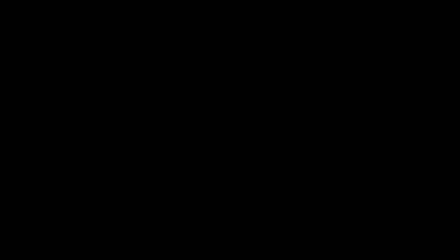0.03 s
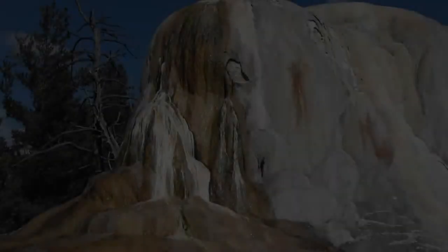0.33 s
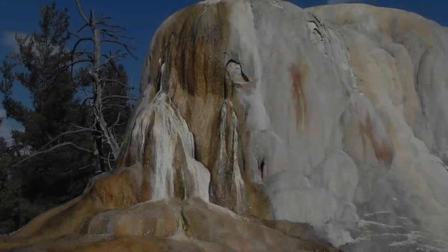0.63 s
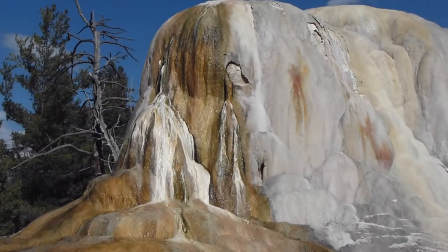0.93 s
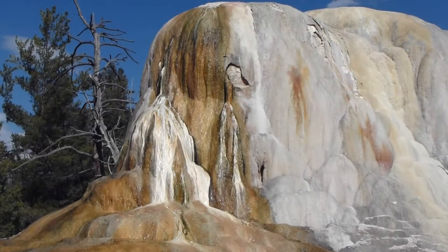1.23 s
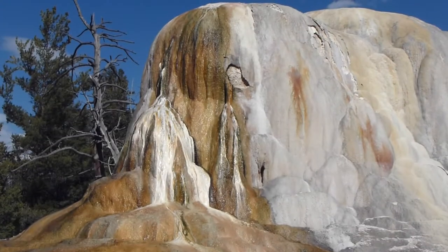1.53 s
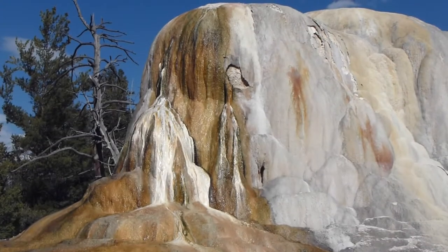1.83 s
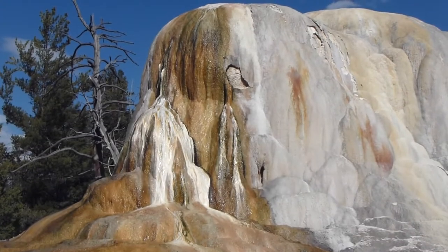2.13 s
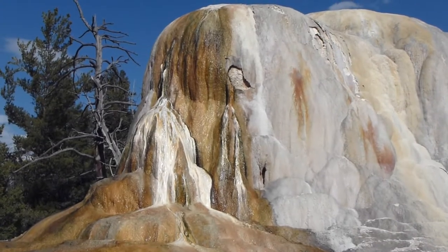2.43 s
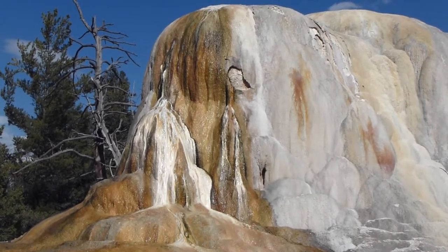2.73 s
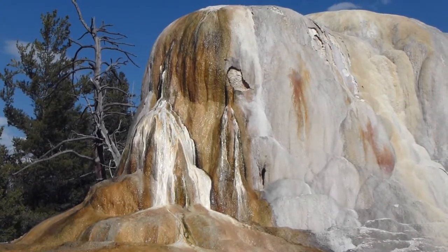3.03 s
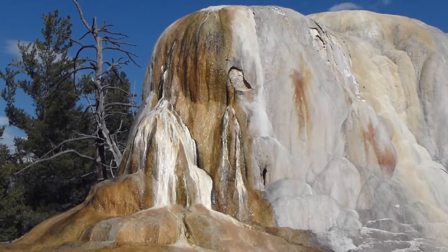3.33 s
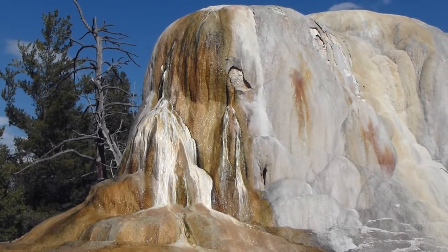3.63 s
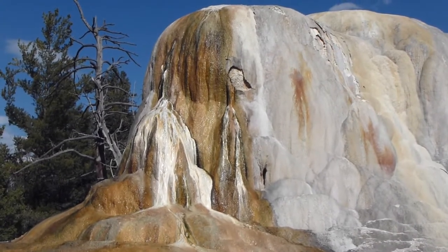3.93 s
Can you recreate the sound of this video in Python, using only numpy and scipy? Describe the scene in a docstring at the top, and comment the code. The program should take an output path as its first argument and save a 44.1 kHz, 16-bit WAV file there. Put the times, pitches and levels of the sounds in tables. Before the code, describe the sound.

Soft wind and faint trickling water outdoors, with a few dull knocks on wood.

```python
"""Beside a hot-spring terrace

Open air fades in: soft wind in the trees and a thin wash of trickling water. The wind is shaped
noise; the water is a crowd of tiny splashes and a fine fizz. A far engine hums underneath, its tones
set by its turning shaft. Small gritty ticks come from close by, and a few dull knocks, like steps on
a boardwalk, stand out as blows set wooden planks ringing."""
import sys
import numpy as np
from scipy import signal
from scipy.fft import rfft, irfft
from scipy.io import wavfile
from scipy.ndimage import uniform_filter1d

SR = 44100
rng = np.random.default_rng(int(sys.argv[2]) if len(sys.argv) > 2 else 0)


def file_out(sig):
    """Save sig as 16-bit WAV at sys.argv[1]."""
    # one column per channel
    cols = np.atleast_2d(sig).T
    # limit, then scale
    lim = np.clip(cols, -1, 1)
    pcm = np.round(lim * 32767).astype(np.int16)
    wavfile.write(sys.argv[1], SR, pcm)


N = 176400  # 4 seconds

# The fade-in. Each row: time in seconds, gain in dB.
FADE_IN = [(.283, -30), (.37, -24), (.47, -18), (.62, -11), (.77, -5.5), (.92, -2.5), (1.07, -0.5),
           (4, -0.5)]
# The airy rush that both sides share. Each row: frequency in Hz, relative level in dB.
AIR_SHARED = [(15, -49), (25, -18), (77, -8), (145, -5.5), (168, -4.5), (196, -2.5), (223, -4), (280, -4),
              (352, -5.5), (454, -7.5), (516, -10.5), (616, -10), (736, -10.5), (1190, -12.5),
              (1500, -17.5), (2250, -18.5), (4710, -29.5), (9610, -36), (10900, -48.5), (14200, -80),
              (22000, -120)]
# The airy rush that differs between the sides. Each row: frequency in Hz, relative level in dB.
AIR_SIDE = [(15, -53), (25, -10), (81, -10), (223, -3), (443, -2), (1080, -4.5), (4960, -14), (7840, -22),
            (9130, -40), (10900, -64), (14200, -72), (22000, -120)]
# Which way the air leans. Each row: frequency in Hz, left minus right in dB.
AIR_LEAN = [(60, -2), (140, 0), (340, -1.0), (790, -1.5), (1870, -3), (4430, 0), (10500, 0.0)]
# The slow swell of the breeze. Each row: time in seconds, gain in dB.
BREEZE_SWELL = [(0, 0), (1.1, 1), (1.5, 2), (2, 1.5), (2.7, 0), (3.25, 1), (3.7, -0.5), (4, 0)]
# The low rush of wind. Each row: time in seconds, level in dB.
GUST_LEVEL = [(.3, -57), (1.1, -50.5), (1.25, -54), (1.36, -58), (1.52, -44), (1.75, -66), (2.7, -68),
              (3.2, -59), (3.5, -48.5), (3.7, -52.5), (4, -46)]
# The fine spray. Each row: time in seconds, level in dB.
SPRAY_LEVEL = [(.3, -66), (.78, -73), (.95, -80), (1.1, -82), (1.7, -69.5), (2.6, -67), (3.2, -67),
               (3.6, -65), (4, -66)]
# The engine's weaker tones. Each row: multiple of the shaft's turning rate, level in dB.
ENGINE_TONES = [(2, -63), (4, -57.5), (8, -61), (10, -59.5), (15, -63)]
# The engine's strongest tone. Each row: time in seconds, level in dB.
MAIN_TONE_LEVEL = [(.3, -46), (.65, -47.5), (1.0, -51), (1.3, -48), (1.58, -54), (1.8, -49), (2.2, -49.5),
                   (2.42, -54), (2.65, -50.5), (2.87, -56), (3.05, -48.5), (3.33, -46.5), (3.56, -53),
                   (3.8, -47.5), (4, -45)]
# Two faint drones. Each row: pitch in Hz, width in Hz, level in dB.
FAINT_DRONES = [(74.4, 7.1, -61.5), (602, 8.3, -62.5)]
# Small ticks nearby. Each row: start in seconds, level in dB, centre frequency in Hz,
# left minus right in dB, seconds to fade by 60 dB.
NEAR_TICKS = [(0.465, -25.5, 1600, 11, 0.0085), (.689, -39, 2000, 4, 0.025), (.815, -41.5, 1930, 10, 0.053),
              (0.852, -50.5, 8700, -30, 0.033), (2.019, -40, 1600, 4, 0.029), (2.039, -47, 2000, 4, 0.035),
              (2.067, -43.5, 1900, 4, 0.054), (2.097, -46, 2000, 2, 0.025), (2.2, -41.5, 1890, 0, .03),
              (2.687, -38, 1500, -1, .025), (3.203, -42, 1900, 0, 0.027), (3.416, -43, 1800, -2, .03)]
# Knocks on wood. Each row: start in seconds, level in dB, treble limit in Hz, thud and scuff in dB
# relative to that level, seconds for the rattle to fade by 30 dB.
WOOD_KNOCKS = [(1.2163, -25, 1300, -8, -30, .06), (1.2505, -28.5, 2300, -1, -18, .05),
               (1.2565, -32, 1300, 1, -25, .03), (1.8335, -27.5, 3000, -13, -12, .055),
               (1.8378, -32, 2800, -4, -11, .045), (1.847, -34, 3000, -2, -11, .03),
               (2.634, -36, 2600, -3, -10, .03), (2.845, -27, 1400, -9, -26, .04),
               (2.986, -36, 2400, -8, -10, .02), (3.091, -32, 1900, -20, -22, .02),
               (3.5196, -31, 1500, -4, -22, .045), (3.5328, -30, 1300, -7, -25, .025),
               (3.9662, -28.5, 1500, -7, -22, .045), (3.982, -37, 2900, -12, -10, .04)]
# The notes a plank rings with. Each row: pitch in Hz, relative level in dB, seconds to fade by 60 dB.
PLANK_NOTES = [(413, -10, .045), (614, -2, .09), (720, 4, .018), (920, -5, .045), (1055, 1.5, .04),
               (1130, 4, .016), (1250, -5, .025), (1830, -5, .015), (2340, -3, .01), (2850, -7, .008)]
# The short rattle after a knock. Each row: frequency in Hz, relative level in dB.
RATTLE_SPECTRUM = [(100, -22), (300, 10), (650, 19), (1200, 6), (1550, -15), (2300, -1.5), (4000, -27),
                   (9000, -12)]


def amp(db):
    """Turns decibels into a gain."""
    return 10 ** (np.asarray(db) / 20)


def unit(x):
    """Scales a signal to an average (rms) level of 1."""
    return x / np.sqrt(np.mean(x ** 2) + 1e-20)


def at_hz(points, hz):
    """Reads a table at the given frequencies, on a log-frequency scale."""
    f, value = np.transpose(points)
    return np.interp(np.log(hz + 1), np.log(f + 1), value)


def over_time(points):
    """Reads a table of times and values at every sample."""
    return np.interp(np.arange(N) / SR, *np.transpose(points))


def add(mix, start_s, sound):
    """Adds a stereo sound into the mix at its start time."""
    part = mix[:, round(start_s * SR):][:, :sound.shape[1]]
    part += sound[:, :part.shape[1]]


def panned(lean_db):
    """Left and right gains; a positive lean favours the left."""
    return amp(np.array([[.5], [-.5]]) * lean_db)


def noise(shape_db, size=N):
    """Noise of level 1, shaped by a function that gives dB for each frequency."""
    gains = amp(shape_db(np.fft.rfftfreq(size, 1 / SR)))
    return unit(irfft(rfft(rng.standard_normal(size)) * gains, size))


def noise_band(centre_hz, octave_db, size=N):
    """Noise that is strongest at its centre and octave_db weaker an octave away."""
    return noise(lambda f: -octave_db * np.log2((f + 1) / centre_hz) ** 2, size)


def drift(rate_hz):
    """A slow random wander of level 1."""
    return noise(lambda f: -20 * np.log10(1 + (f / rate_hz) ** 2))


def patchy(x, patch_db, flicker_db):
    """Lets narrow patches and wide bands of frequencies come and go at random."""
    frames = signal.stft(x, nperseg=512, noverlap=384)[2].T
    narrow, wide = uniform_filter1d(rng.standard_normal((2,) + frames.shape), size=12, axis=1)
    patches = unit(uniform_filter1d(narrow, size=7, axis=1))
    flicker = unit(uniform_filter1d(wide, size=90, axis=1))
    frames = frames * amp(patch_db * patches + flicker_db * flicker)
    return signal.istft(frames.T, nperseg=512, noverlap=384)[1][:N]


def air(shared_db=-43.5, side_db=-48.5):
    """Wind and far water blend into one wide rush that swells with the breeze."""
    rush = patchy(noise(lambda f: at_hz(AIR_SHARED, f)), patch_db=1.2, flicker_db=.4)
    shared = amp(shared_db + over_time(BREEZE_SWELL)) * unit(rush)
    side = amp(side_db) * noise(lambda f: at_hz(AIR_SIDE, f))
    lean = panned(at_hz(AIR_LEAN, np.fft.rfftfreq(N, 1 / SR)))
    return irfft(rfft(np.array([shared + side, shared - side])) * lean, N)


def gusts():
    """A soft, low rush of wind comes and goes."""
    return amp(over_time(GUST_LEVEL)) * noise_band(centre_hz=320, octave_db=20)


def trickle(low_hz=1200, high_hz=7000, pitches=28, drops_per_s=1100, cycles=5, level_db=-57.5):
    """Tiny splashes each ring for a few cycles and reach the right side first."""
    out, t = np.zeros((2, N)), np.arange(512) / SR
    for hz in np.geomspace(low_hz, high_hz, pitches):
        lands = rng.random(N) < drops_per_s / pitches / SR
        hits = lands * amp(4 * np.minimum(rng.exponential(1, N), 5))  # a few are up to 20 dB louder
        left_lag_s = .0001 * rng.uniform(.51, 3.05)
        age = np.maximum(t - np.array([[left_lag_s], [0]]), 0) * hz  # counted in cycles
        drop = np.sin(2 * np.pi * age) * age * np.exp(-age * np.pi / cycles)
        drop *= amp(-3 * np.log2(hz / low_hz))  # 3 dB softer for each octave up
        out += signal.oaconvolve(hits[None], drop, axes=1)[:, :N]
    return amp(level_db) * unit(out)


def spray():
    """Fine spray makes a thin, uneven fizz straight ahead."""
    fizz = noise_band(centre_hz=8300, octave_db=22)
    return amp(over_time(SPRAY_LEVEL)) * unit(patchy(fizz, patch_db=2.5, flicker_db=2.5))


def engine(shaft_hz=44.55, main_multiple=5, speed_wander=.0018, waver_db=2):
    """A far engine idles; each of its tones wavers on the way through the air."""
    turns = np.cumsum(shaft_hz * (1 + speed_wander * drift(3.14))) / SR
    tones = [(multiple, db + waver_db * drift(4.0)) for multiple, db in ENGINE_TONES]
    tones.append((main_multiple, over_time(MAIN_TONE_LEVEL) + drift(2.2)))  # wavers by about 1 dB
    hum = sum(amp(db) * np.sqrt(2) * np.sin(2 * np.pi * (multiple * turns + rng.random()))
              for multiple, db in tones)
    return hum * panned(lean_db=-1.5)


def drones():
    """Two narrow bands of noise hum faintly beside the engine."""
    return sum(amp(db) * noise(lambda f: -20 * np.log10(1 + ((f - hz) / width * 2) ** 4))
               for hz, width, db in FAINT_DRONES)


def ticks(rise_s=.0018):
    """Brief bursts of noise make gritty ticks close by."""
    out, t = np.zeros((2, N)), np.arange(4096) / SR
    for start_s, db, hz, lean_db, fade_s in NEAR_TICKS:
        grit = noise_band(hz, octave_db=9, size=len(t))
        loudness = np.minimum(t / rise_s, 1) * amp(db - 60 * t / fade_s)
        add(out, start_s, grit * loudness * panned(lean_db))
    return out


def plank_ring(t):
    """A struck plank rings with several short notes, tuned a little differently at each blow."""
    return sum(amp(db - 60 * t / fade_s)
               * np.sin(2 * np.pi * (hz * rng.uniform(.99, 1.01) * t + rng.random()))
               for hz, db, fade_s in PLANK_NOTES)


def rattle(t, band, fade_s, level_db=-16.5, rise_s=.0018):
    """A knock leaves a short, noisy rattle, slightly different on each side."""
    bursts = [noise(lambda f: at_hz(RATTLE_SPECTRUM, f), len(t)) for _ in range(2)]
    shared, side = (unit(signal.sosfilt(band, burst)) for burst in bursts)
    loudness = np.minimum(t / rise_s, 1) * amp(level_db - 30 * t / fade_s)
    return (shared + .25 * np.array([side, -side])) * loudness


def knocks(rise_s=.0009, thud_hz=370, thud_fade_s=.016, scuff_fade_s=.03, echo_s=.0062, echo_db=-8):
    """Each blow rings the planks, thuds, scuffs and rattles, and echoes once off the ground."""
    out, t = np.zeros((2, N)), np.arange(8192) / SR
    rise = np.minimum(t / rise_s, 1)
    scuff_band = signal.butter(4, [1600, 2900], "bandpass", fs=SR, output="sos")
    for start_s, db, top_hz, thud_db, scuff_db, rattle_s in WOOD_KNOCKS:
        # each knock has its own treble limit, so some sound dull and others crisp
        band = signal.butter(4, [205, top_hz], "bandpass", fs=SR, output="sos")
        planks = signal.sosfilt(band, rise * plank_ring(t))
        thud = rise * amp(thud_db - 60 * t / thud_fade_s) * np.sin(2 * np.pi * thud_hz * t)
        blow = planks / abs(planks).max() + thud
        grit = unit(signal.sosfilt(scuff_band, rng.standard_normal(len(t))))
        scuff = grit * amp(scuff_db - 60 * t / scuff_fade_s)
        add(out, start_s, amp(db) * (blow + rattle(t, band, rattle_s) + scuff))
        add(out, start_s + echo_s, amp(db + echo_db) * blow * panned(lean_db=-1))
    return out


def scene():
    """All the sounds play together."""
    return air() + gusts() + trickle() + spray() + engine() + drones() + knocks() + ticks()


def record(dry, start_s=.286, cutoff_hz=11050):
    """The sound fades in after a moment of silence, and its highest treble is cut away."""
    switch_on = np.clip((np.arange(N) / SR - start_s) / .005, 0, 1)
    faded = dry * amp(over_time(FADE_IN)) * switch_on
    treble_cut = signal.firwin(511, cutoff_hz, window=("kaiser", 9), fs=SR)
    return signal.oaconvolve(faded, treble_cut[None], "same")


dry = scene()
out = record(dry)
file_out(out)
```